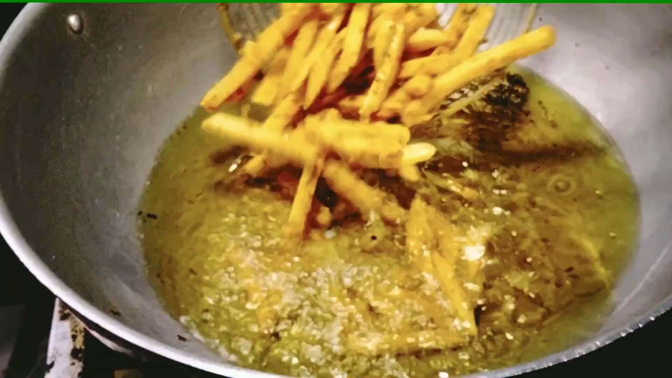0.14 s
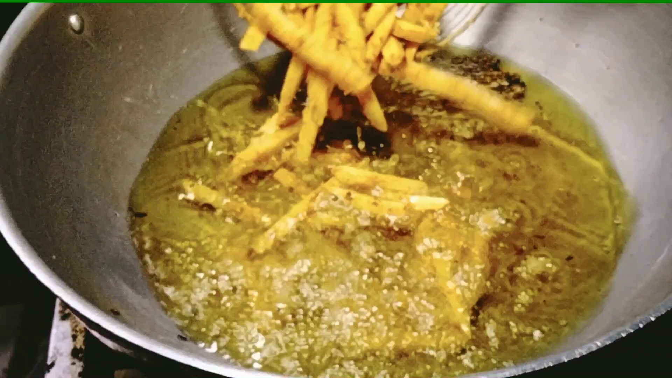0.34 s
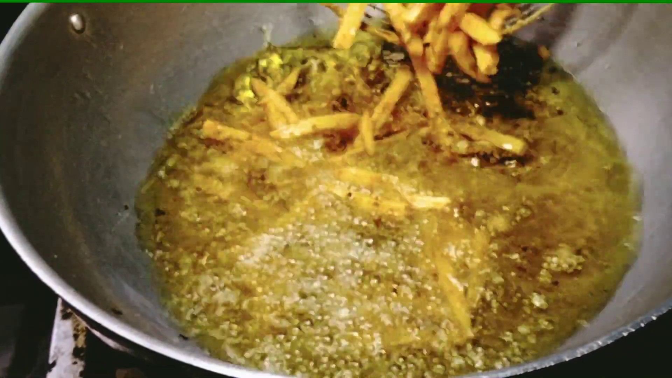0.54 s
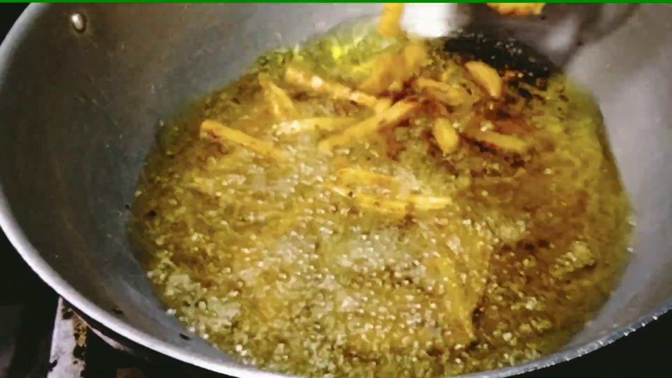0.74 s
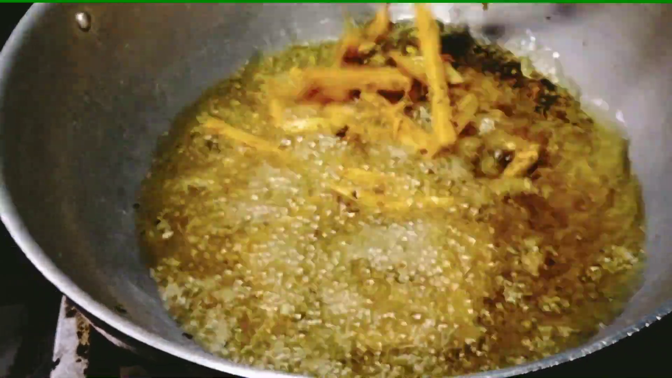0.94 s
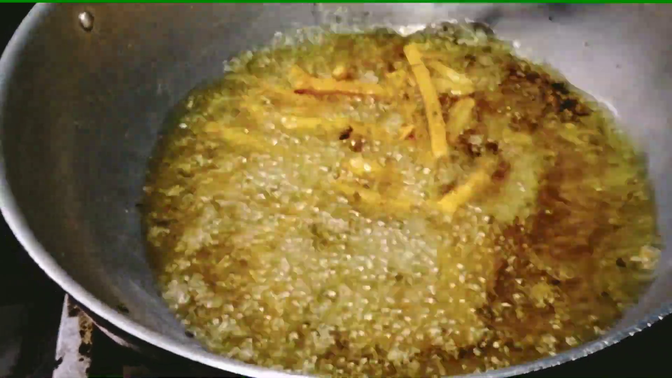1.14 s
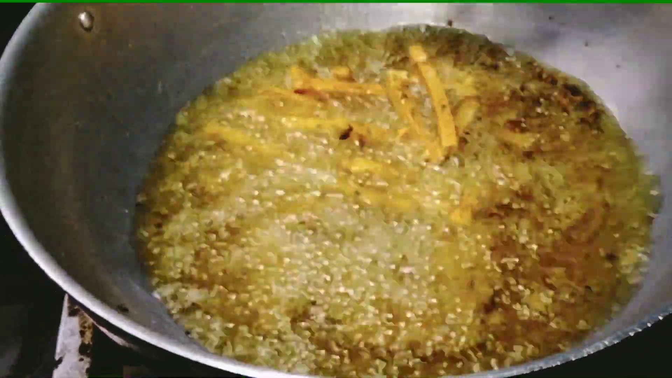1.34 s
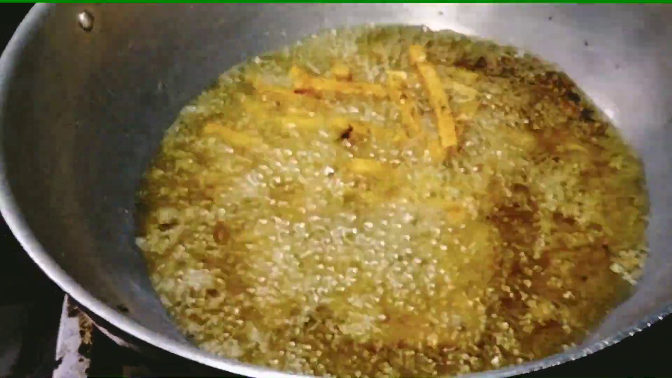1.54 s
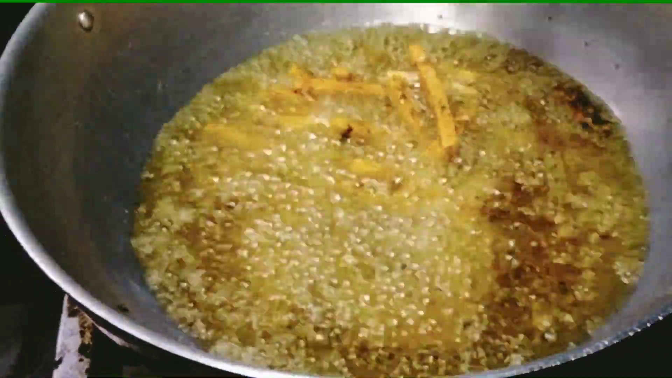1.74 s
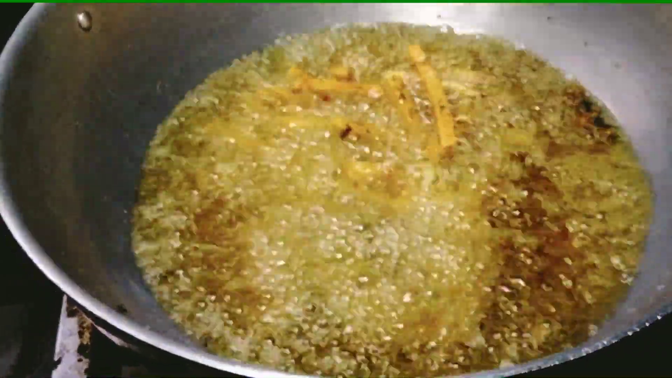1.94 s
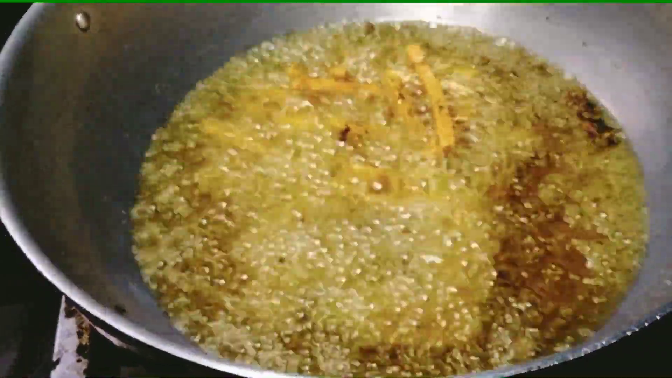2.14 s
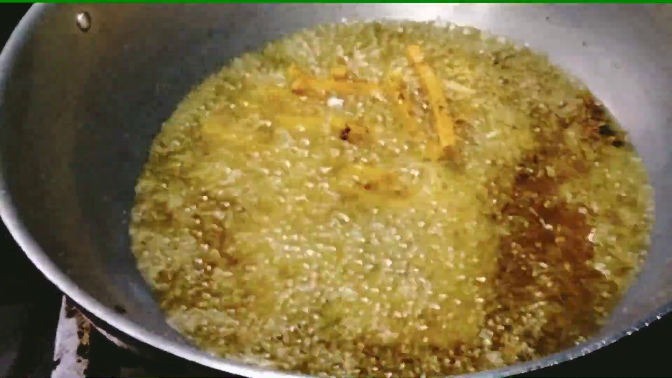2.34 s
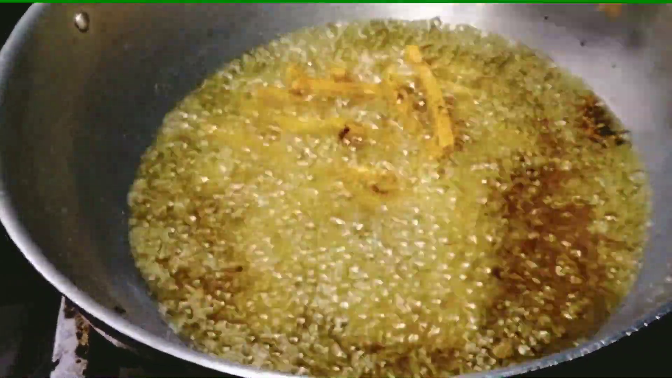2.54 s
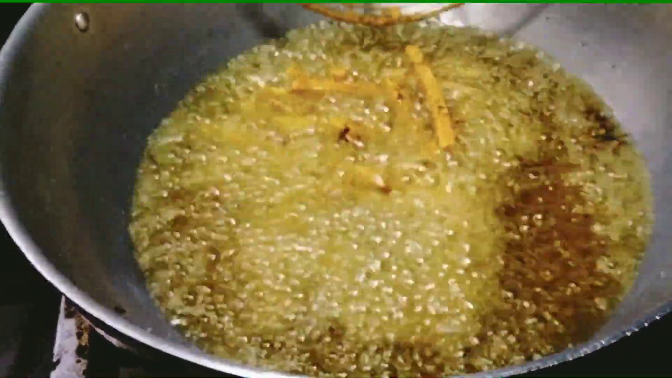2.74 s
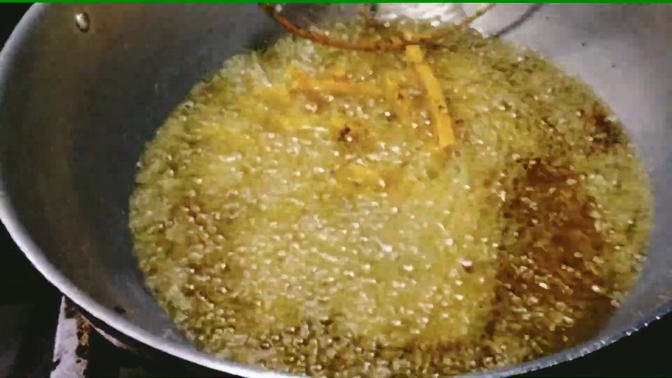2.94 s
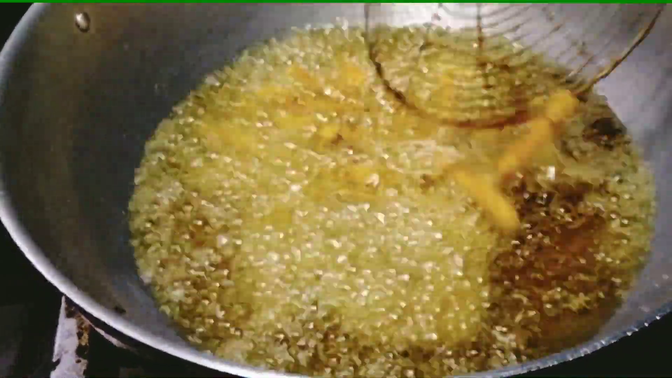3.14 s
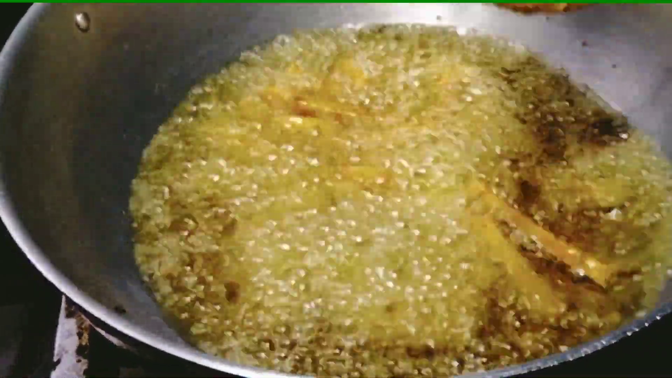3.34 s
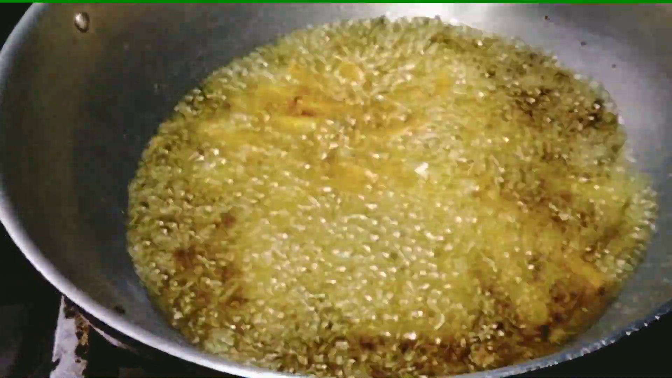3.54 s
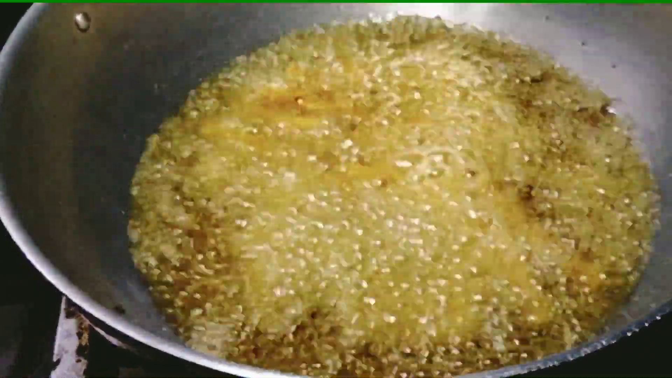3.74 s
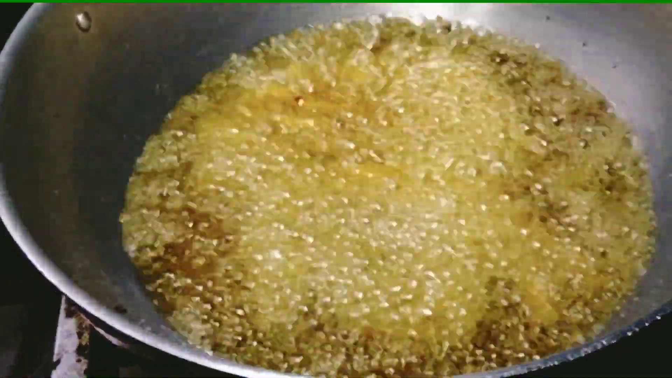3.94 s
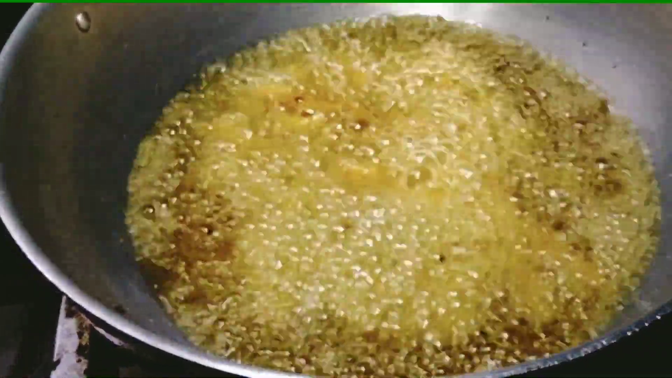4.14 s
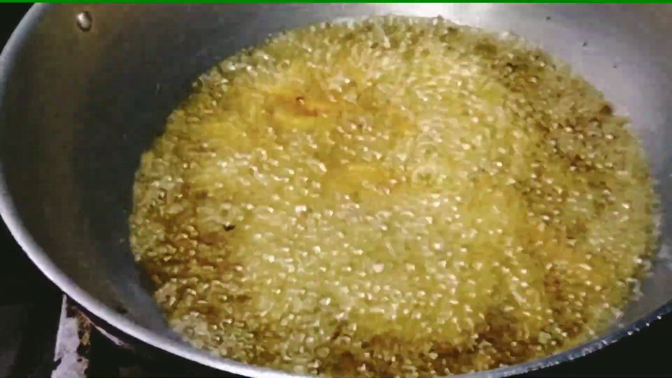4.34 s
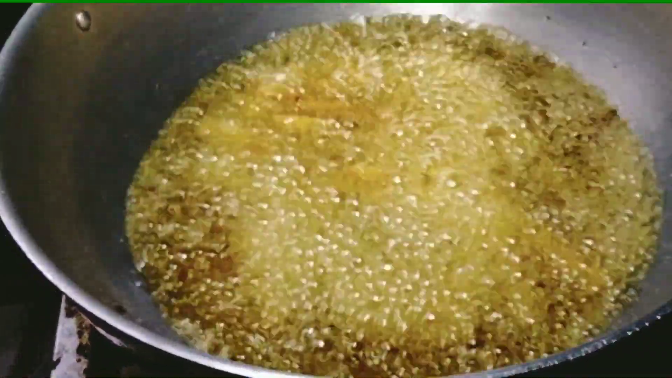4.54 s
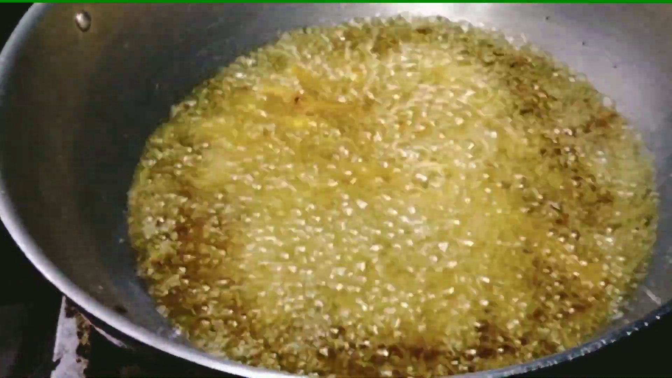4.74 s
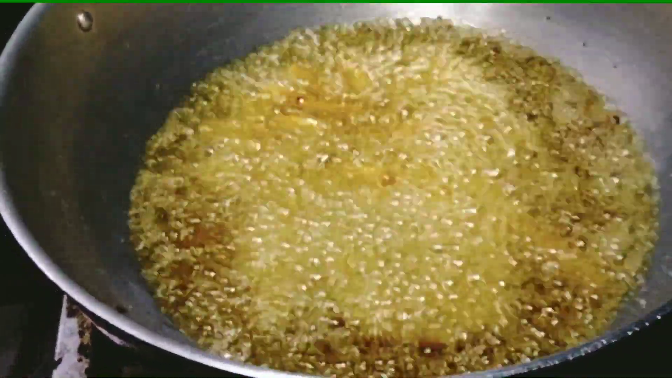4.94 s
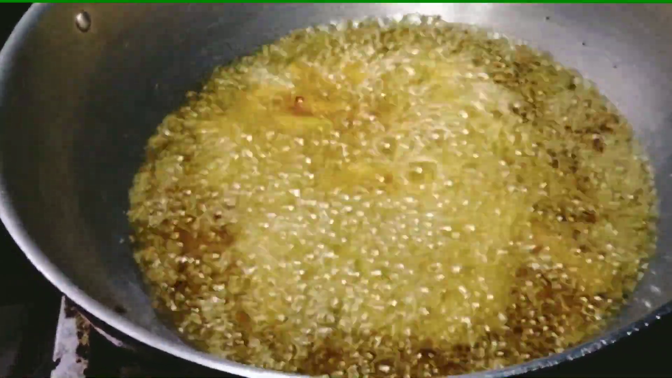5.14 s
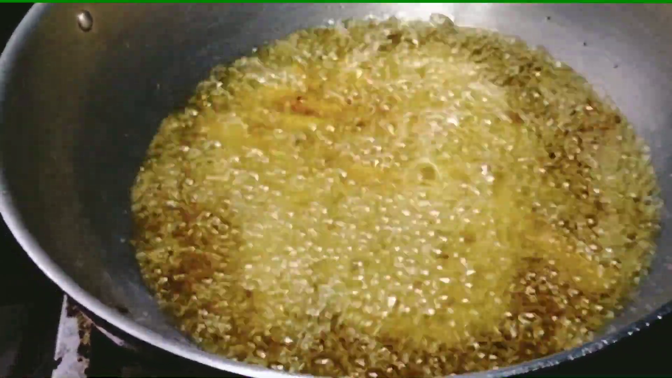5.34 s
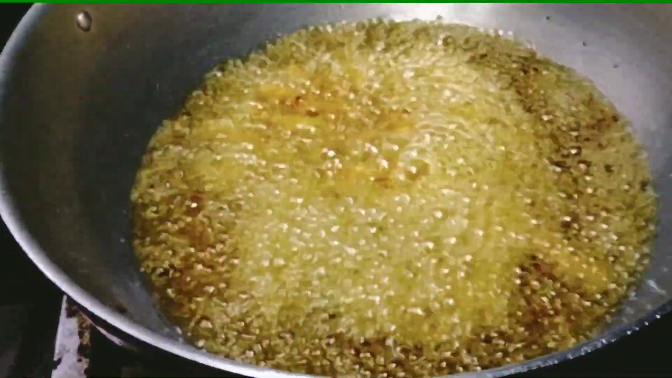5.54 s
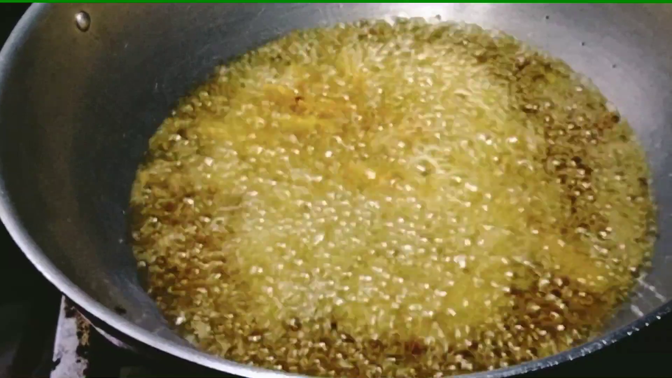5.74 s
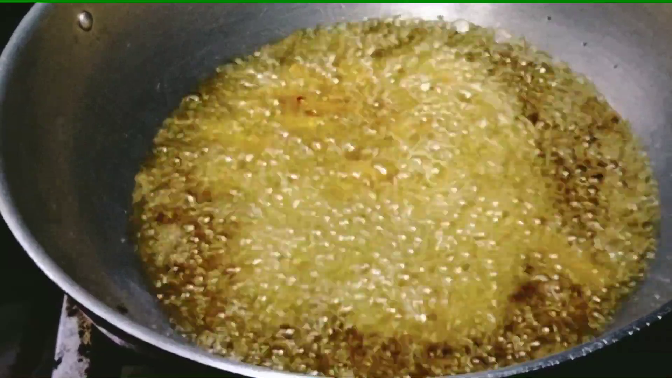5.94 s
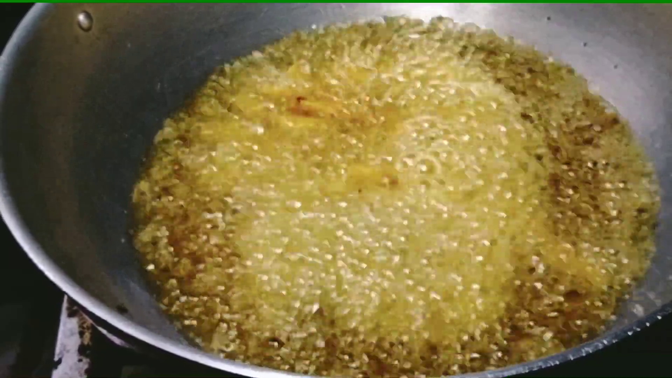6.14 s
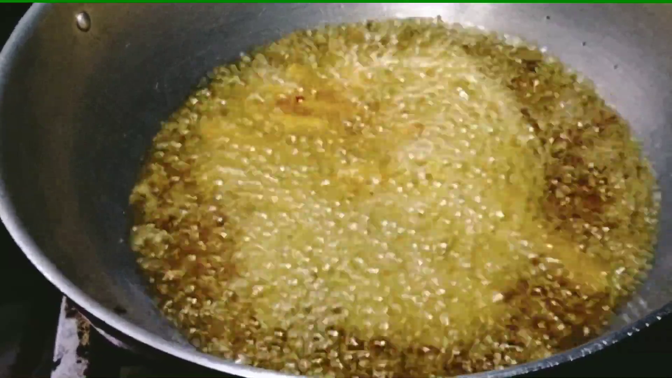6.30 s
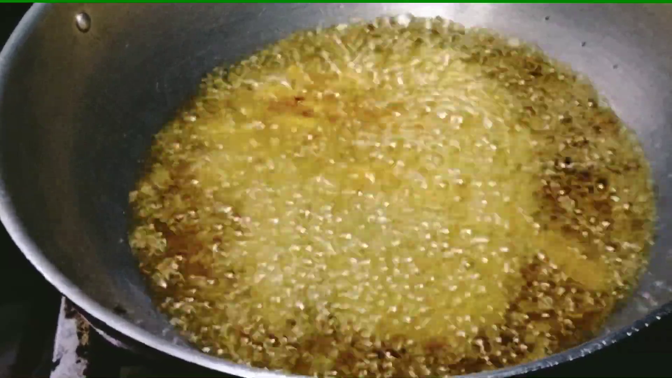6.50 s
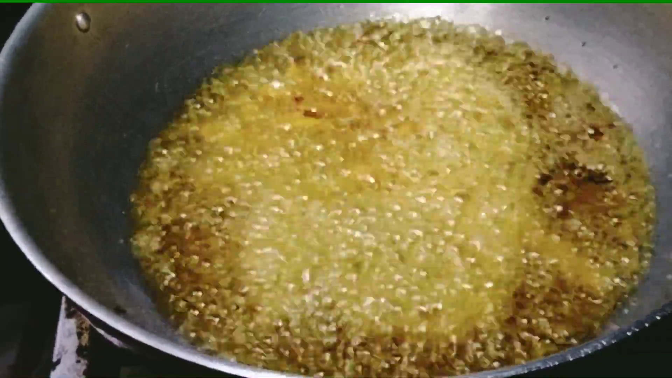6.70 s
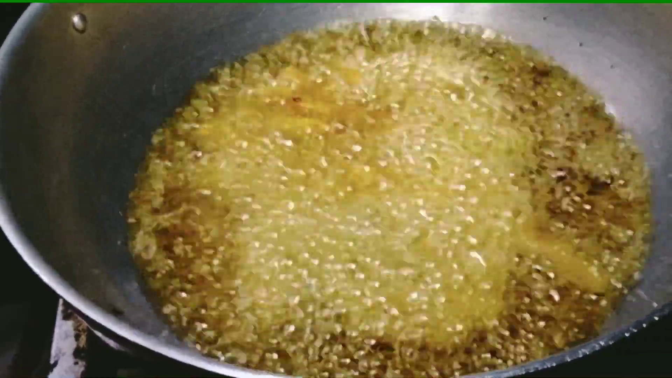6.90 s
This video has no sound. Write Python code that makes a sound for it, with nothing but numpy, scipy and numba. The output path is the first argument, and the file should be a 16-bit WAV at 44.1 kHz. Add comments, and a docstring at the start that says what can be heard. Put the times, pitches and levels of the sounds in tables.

```python
"""A loud, crackling sizzle comes first: potato sticks are tipped into hot oil in a steel wok.
Thousands of steam bubbles burst with sharp ticks over a hiss, larger bubbles ping, the foam murmurs
and a burner rumbles. At first the bowl being emptied adds a close echo, which slides away as the bowl
is pulled back. The frying slowly dies down, close to one small microphone."""
import sys
import numpy as np
from scipy import signal
from scipy.fft import rfft, irfft
from scipy.io import wavfile
from scipy.ndimage import uniform_filter1d, map_coordinates
from numba import njit

SR = 44100
rng = np.random.default_rng(int(sys.argv[2]) if len(sys.argv) > 2 else 0)


def wav_out(sig):
    """Save sig, one row per channel (or a flat mono array), as 16-bit PCM at SR to the path in sys.argv[1]."""
    wavfile.write(sys.argv[1], SR, np.round(np.clip(np.atleast_2d(sig).T, -1, 1) * 32767).astype(np.int16))


N = 307225

# The boil swells, dies down and picks up a little when a second handful goes in.
# Each row: time in seconds, sizzle level in dB, foam level in dB.
BOIL_LEVELS = [(0.0, -26, -47), (0.33, -22, -40.5), (0.72, -20, -38.5), (1.1, -19.5, -40.5),
               (3.05, -29, -43), (3.3, -27.5, -42.5), (3.75, -28.5, -42), (4.66, -33, -45),
               (6.4, -39.5, -49.5), (6.97, -41, -50)]
def frying():
    """Water boils out of the potato into the oil. Pings and spits follow the level of the sizzle."""
    sizzle_db, foam_db = curves(BOIL_LEVELS)
    return sizzle(sizzle_db) + pings(sizzle_db) + foam(foam_db) + spits(sizzle_db)


# The tone of the sizzle, with a peak from the microphone's opening.
# Each row: frequency in Hz, relative level in dB.
SIZZLE_TONE = [(880, -47.5), (1500, -19.5), (2340, -20.5), (2530, -19.5), (4340, -10), (5860, -10),
               (7460, -5), (8620, 3), (9140, -0.5), (10500, -9), (11600, -14), (15100, -13.5)]
def sizzle(level_db, bursts_per_s=2400, low_hz=2400, high_hz=16700, thins_below_db=-33.5):
    """Tiny bubbles burst in clusters, mostly faint, over the hiss of those too small to tell apart."""
    chance, strength, smallness = rng.random(N), rng.exponential(1, N), rng.random(N)
    starts = np.flatnonzero(chance < bursts_per_s * undb(2 * wander(40)) / SR)
    hz = low_hz + (high_hz - low_hz) * smallness[starts]
    cycles = 2.06 * (0.6 + smallness[starts])
    spread_db = 4 + smallness[starts]  # the smallest bubbles differ most in strength
    gains = undb(spread_db * np.minimum(strength[starts], 4)) * np.sqrt(hz / 1000)
    ticks = unit(ring(starts, hz, cycles, gains, glide=0.13, n=N))
    # The hiss is a little duller than the ticks, and thins out once the sizzle is weak.
    hiss_db = 1.5 + 0.8 * np.minimum(level_db - thins_below_db, 0)
    flicker_db = 0.84 * wander(20)
    dull_noise = unit(signal.lfilter([1], [1, -0.25], rng.standard_normal(N)))
    hiss = undb(hiss_db + flicker_db) * dull_noise
    even_mix = (ticks + hiss) / np.sqrt(1 + undb(2 * hiss_db))
    return undb(level_db) * unit(colour(even_mix, SIZZLE_TONE))


# The loudest spits. Each row: start in seconds, peak level in dB, pitch in Hz.
LOUD_SPITS = [(0.061, -6, 6500), (0.1161, -11, 13900), (0.26, -4, 10100), (0.371, -10, 10100),
              (1.5325, -6, 5900), (1.692, -7, 12100), (1.7743, -9, 14200), (2.1975, -9, 11800),
              (2.763, -7, 12400), (2.987, -10, 11700), (3.0946, -14, 14300), (3.2232, -9, 6700),
              (3.518, -12, 7800), (3.7736, -21, 8900), (4.2273, -19, 14000), (4.4762, -19, 12300),
              (4.6491, -17, 8900), (4.6685, -18, 5400), (4.752, -17, 10100), (5.0409, -20, 8100),
              (5.0559, -17, 13800), (5.1158, -19, 6000), (5.2332, -17, 8500), (5.2691, -18, 14300),
              (5.6306, -14, 12700), (5.8438, -20, 7900), (5.965, -21, 9300), (6.1426, -16, 11300),
              (6.1948, -20, 8700), (6.3632, -22, 14700), (6.657, -17, 9200), (6.7272, -20, 11500),
              (6.7998, -22, 14400), (6.882, -26, 8200), (6.917, -23, 10100), (6.9585, -18, 11700)]
def spits(sizzle_db, per_s=15, ring_ms=0.38, top_hz=14600, span_hz=9600):
    """Single strong bursts ring the microphone's opening: the listed ones, plus random ones."""
    crowd = []
    for when, strength, depth in rng.random((300, 3))[:int(per_s * N / SR)]:
        fade_db = 0.56 * (sizzle_db[int(when * N)] - sizzle_db.max())  # fades less than the sizzle
        crowd.append((when * N / SR, -17 + fade_db + 2 * strength, top_hz - span_hz * depth ** 2))
    out = np.zeros(N + SR)
    for start_s, peak_db, hz in LOUD_SPITS + crowd:
        pitch = np.array([float(hz)])
        burst = ring(np.zeros(1, np.int64), pitch, ring_ms * pitch / 1000, np.ones(1), glide=0.038, n=300)
        spit = colour(burst, SIZZLE_TONE, size=256)
        start = int(start_s * SR)
        out[start:start + len(spit)] += undb(peak_db) * spit / np.abs(spit).max()
    return out[:N]


# The loudest large bubbles. Each row: start in seconds, level in dB, pitch in Hz, ring time in cycles.
LOUD_PINGS = [(1.289, -19, 4320, 5), (1.4019, -13, 4910, 4.6), (1.4994, -11, 4630, 5),
              (2.0809, -21.5, 3110, 7.7), (2.1323, -22, 4680, 5), (2.532, -24, 3650, 6),
              (2.5698, -26, 4300, 5), (2.6835, -23, 3190, 3.7), (2.7092, -19, 4280, 5),
              (3.5316, -15.5, 3580, 6), (3.6897, -21, 3027, 5), (3.7954, -22, 4295, 5.5),
              (4.248, -23, 3040, 6), (4.5533, -19.5, 3130, 10), (5.182, -19, 4750, 4.9),
              (5.7116, -32, 2870, 4), (6.032, -31, 3800, 7), (6.43, -28, 3650, 7), (6.5625, -35, 3900, 7),
              (6.607, -29, 4900, 8), (6.7648, -30, 5600, 7)]
def pings(sizzle_db, per_s=140, low_hz=2310, octaves=1.64):
    """Large bubbles ring lower and longer than tiny ones: the listed ones, plus a random crowd."""
    start_s, level_db, hz, cycles = np.transpose(LOUD_PINGS)
    listed = ring((start_s * SR).astype(np.int64), hz, cycles, undb(level_db), glide=0.04, n=N)
    # The crowd starts far below the sizzle and comes closer between 1.4 and 3.4 seconds.
    crowd_db = sizzle_db + np.interp(np.arange(N) / SR, (1.4, 3.4), (-23, -4.5))
    when, weakness, pitch, length = rng.random((3000, 4))[:int(per_s * N / SR)].T
    starts = (when * N).astype(np.int64)
    gains = undb(crowd_db[starts] + 0.5 * np.log(1 - 0.97 * weakness))
    crowd_hz = low_hz * 2 ** (octaves * pitch)
    return listed + ring(starts, crowd_hz, 2.8 + 6.1 * length, gains, glide=0.055, n=N)


# The tone of the foam. Each row: frequency in Hz, relative level in dB.
FOAM_TONE = [(290, -36), (500, -2.5), (696, -7.5), (880, -2), (1210, -6), (1540, -4), (1770, -2.5),
             (1940, -4.5), (2540, -3), (2850, -4.5), (3270, -2.5), (4000, -7), (5200, -34), (8800, -120)]
def foam(level_db):
    """The froth murmurs below the sizzle: a deeper, grainy noise that flickers."""
    grains = rng.standard_normal(N) * undb(0.5 * wander(400) + 0.72 * wander(9))
    return undb(level_db) * unit(colour(grains, FOAM_TONE))


def wok_echo(sound, fade_s=0.017, echo_db=-11.5, size=1024):
    """The steel wok throws each burst back as a short tail, different from each spot in the oil."""
    blocks = np.pad(sound, (0, -N % size)).reshape(-1, size)
    t = np.arange(2 * size + 1) / SR
    tails = rng.standard_normal((len(blocks), len(t))) * undb(-60 * t / fade_s) * (t > 0.001)
    tails /= np.sqrt(np.sum(tails ** 2, axis=1, keepdims=True))
    echoes = signal.fftconvolve(blocks, tails, axes=1).reshape(-1, 3, size)
    overlapped = sum(np.roll(echoes[:, k].ravel(), k * size) for k in range(3))
    return sound + undb(echo_db) * overlapped[:N]


# Echoes from edges near the microphone while the bowl is held there.
# Each row: delay in milliseconds, starting strength (a minus sign flips the wave).
EDGE_ECHOES = [(0.043, -1.05), (0.126, -0.42)]
def bowl_echo(sound, leaves_s=0.7, ease_s=0.025, recede_ms_per_s=1.43, creep_ms_per_s=0.028):
    """Sound bounces off the bowl. As the bowl is pulled back, its echo comes later and fades."""
    t = np.arange(N) / SR
    away_ms = recede_ms_per_s * ease_s * np.logaddexp(0, (t - leaves_s) / ease_s)
    delay_ms = 0.2154 + creep_ms_per_s * t + away_ms
    closeness = np.clip(1 - 0.36 * t, 0, 1)
    gain = 0.98 * closeness * np.exp(-away_ms / 0.23)
    first_bounce = -gain * delay(sound, delay_ms)
    second_bounce = 0.29 * gain ** 2 * delay(sound, 2 * delay_ms)
    edges = sum(strength * delay(sound, ms) for ms, strength in EDGE_ECHOES)
    mix = sound + first_bounce + second_bounce + closeness * np.exp(-away_ms / 0.21) * edges
    # Keep the loudness as it was, so only the tone changes.
    return mix * np.sqrt(uniform_filter1d(sound ** 2, 2000) / uniform_filter1d(mix ** 2, 2000))


# The burner swells and sinks. Each row: time in seconds, deep rumble level in dB, roar level in dB.
BURNER_LEVELS = [(0.0, -50, -55.5), (0.21, -65, -53), (0.23, -60, -52.5), (0.47, -60, -53),
                 (2.35, -55.5, -49.5), (2.44, -66, -53), (2.73, -50, -52.5), (2.83, -63, -51),
                 (3.53, -61.5, -49), (3.73, -51, -55), (3.84, -62, -50), (4.42, -59.5, -53.5),
                 (4.7, -65, -52.5), (5.08, -60, -48), (5.59, -59.5, -53), (6.29, -55, -50),
                 (6.38, -63, -56.5), (6.97, -58, -49)]
# The tone of the flame. Each row: frequency in Hz, relative level in dB.
FLAME_TONE = [(24, -34), (40, -13), (59, -13.5), (183, 1), (259, -1.5), (322, -1), (373, -2.5), (418, -3),
              (600, -13.5), (780, -17), (1320, -120)]
# Low notes the kitchen rings at. Each row: pitch in Hz, width in Hz, level of the added ring in dB.
KITCHEN_NOTES = [(88.8, 6.4, 2), (113.4, 5, 6), (165.5, 6.1, 1), (199.5, 20, 0.5), (257.4, 24, 1),
                 (313.6, 12, 5.5), (342, 9.9, 6.5), (418, 28, 3.5), (507, 7.8, -6)]
def burner(shudder_hz=24, shudder_db=-63):
    """The flame rumbles and makes the kitchen ring, over a faint shudder almost too low to hear."""
    deep_db, roar_db = curves(BURNER_LEVELS)
    flame = colour(rng.standard_normal(N), FLAME_TONE, size=4096)
    rumble = flame + sum(undb(db) * signal.lfilter(*signal.iirpeak(hz, hz / width, SR), flame)
                         for hz, width, db in KITCHEN_NOTES)
    deep = signal.sosfiltfilt(signal.butter(2, (45, 135), "band", fs=SR, output="sos"), rumble)
    shudder_gain = undb(shudder_db + 2 * wander(3.05))
    shudder_phase = 2 * np.pi * shudder_hz * np.cumsum(1 + 0.075 * wander(4)) / SR
    roar = undb(roar_db + 0.25 * wander(6)) * unit(rumble - deep)
    return roar + undb(deep_db) * unit(deep) + shudder_gain * np.sin(shudder_phase)


# Brief drops in level. Each row: start in seconds, end in seconds, change in dB.
LEVEL_DIPS = [(0.11, 0.219, -6.5), (0.372, 0.45, -2)]
def dips(sound):
    """The whole sound dips briefly, sliding quickly down and back up."""
    t = np.arange(N) / SR
    dip_db = np.zeros(N)
    for start_s, end_s, db in LEVEL_DIPS:
        dip_db[(t > start_s) & (t < end_s)] = db
    return sound * undb(uniform_filter1d(dip_db, 150))


@njit
def ring(starts, hz, cycles, gains, glide, n):
    """Each bubble is a fading sine wave whose pitch rises as it nears the surface."""
    out = np.zeros(n)
    for k in range(len(starts)):
        length = int(cycles[k] * SR / hz[k])
        phase = 0.
        for i in range(min(3 * length, n - starts[k])):
            phase += 2 * np.pi * hz[k] * (1 + glide * i / length) / SR
            envelope = np.exp(-2. * i / length) * min(8. * i / length, 1.)
            out[starts[k] + i] += gains[k] * np.sin(phase) * envelope
    return out


def colour(sound, tone, size=1024):
    """Filters a sound so that it takes on the tone in a table."""
    hz, db = np.transpose(tone)
    grid_hz = np.maximum(np.arange(size + 1) * SR / (2 * size), 1)
    grid_db = np.interp(np.log(grid_hz), np.log(hz), np.maximum(db, -60))
    cepstrum = irfft(grid_db * np.log(10) / 20)
    # Folding this in half makes the filter ring only after a sound, never before it.
    cepstrum[1:size] *= 2
    cepstrum[size + 1:] = 0
    response = irfft(np.exp(rfft(cepstrum)))
    return signal.fftconvolve(sound, response)[:N]


def wander(per_s):
    """A smooth random wobble with a typical size of 1."""
    hold = int(SR / per_s)
    steps = np.repeat(rng.standard_normal(N // hold + 1), hold)
    return unit(uniform_filter1d(uniform_filter1d(steps, hold), hold)[:N])


def curves(table):
    """Joins a table's timed levels with straight lines, one value for each sample."""
    times, *columns = np.transpose(table)
    return [np.interp(np.arange(N) / SR, times, column) for column in columns]


def delay(sound, ms):
    """Makes a sound arrive later; the delay may change over time."""
    return map_coordinates(sound, [np.arange(N) - ms * SR / 1000], order=3)


def undb(db):
    """Turns dB into a number to multiply by."""
    return 10 ** (np.asarray(db) / 20)


def unit(sound):
    """Scales a sound to an average power of 1."""
    return sound / np.sqrt(np.mean(sound ** 2))


def scene():
    """The frying echoes off wok and bowl, over the burner. Both channels are the same."""
    oil = bowl_echo(wok_echo(frying()))
    return np.tile(dips(oil + burner()), (2, 1))


def record(dry, headroom=0.35, top_hz=15480):
    """The microphone rounds off the loudest peaks, and the highest treble is cut steeply."""
    rounded = headroom * np.tanh(dry / headroom)
    return signal.sosfilt(signal.ellip(16, 0.2, 100, top_hz, fs=SR, output="sos"), rounded)


dry = scene()
out = record(dry)
wav_out(out)
```